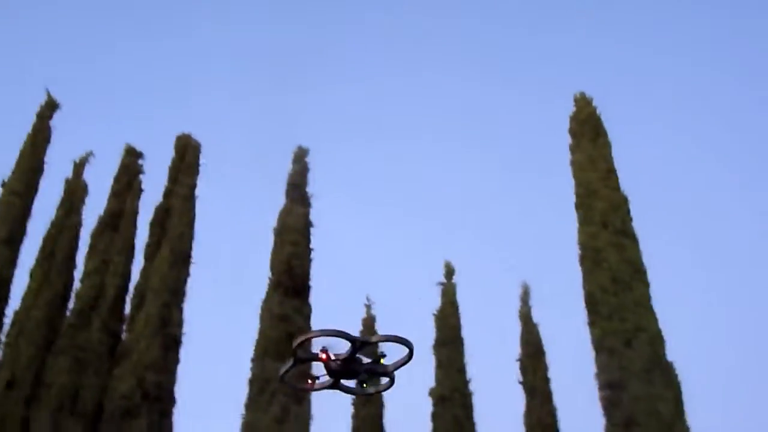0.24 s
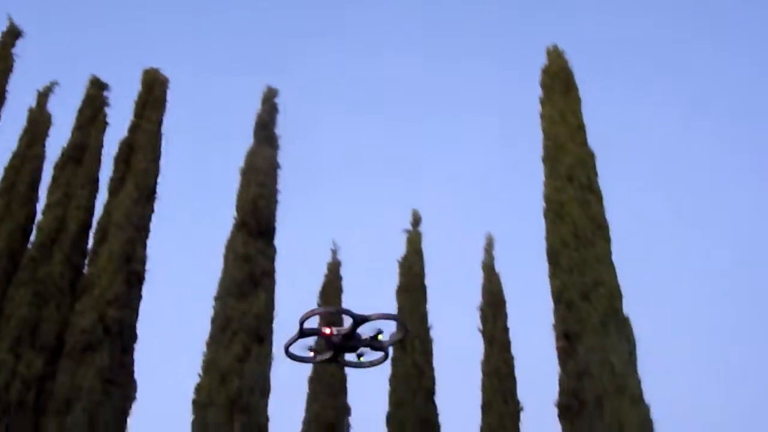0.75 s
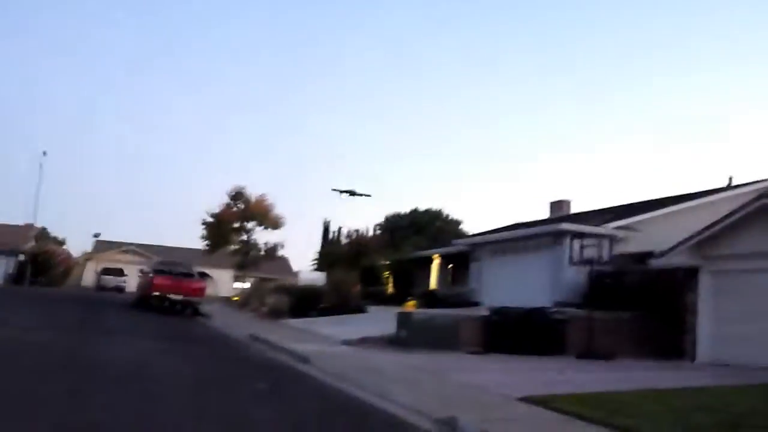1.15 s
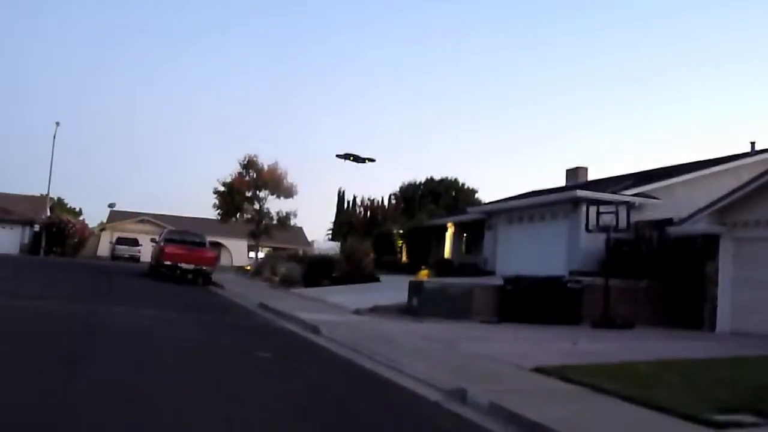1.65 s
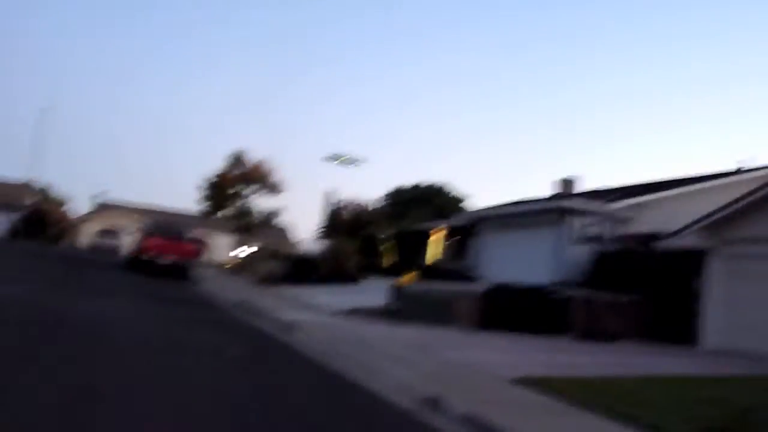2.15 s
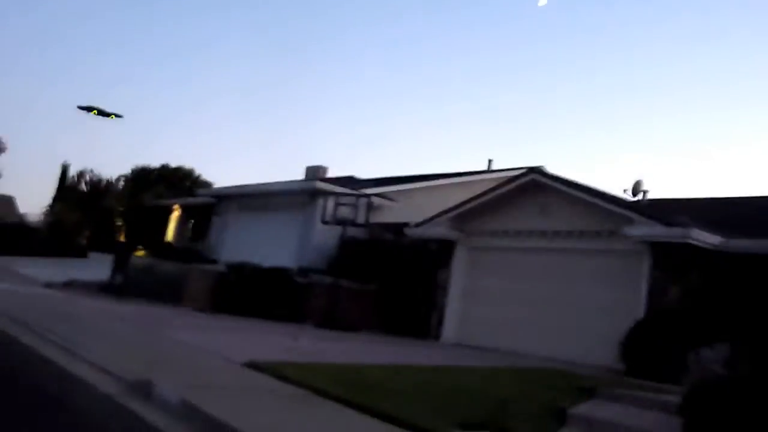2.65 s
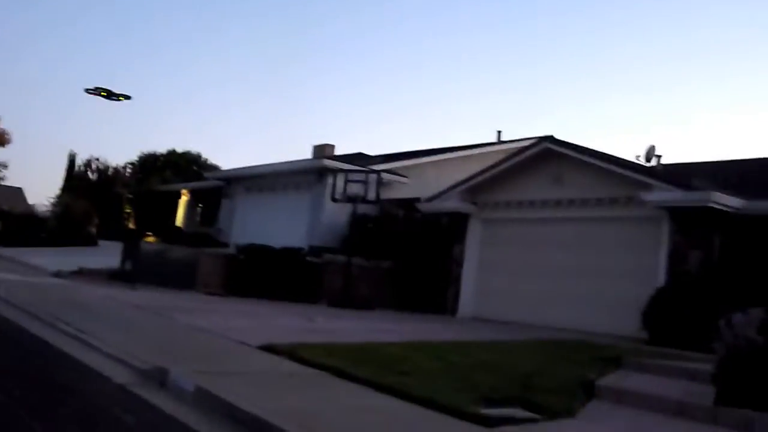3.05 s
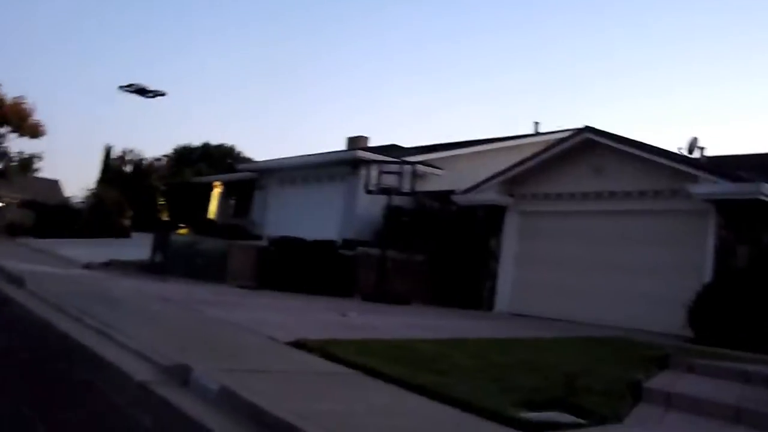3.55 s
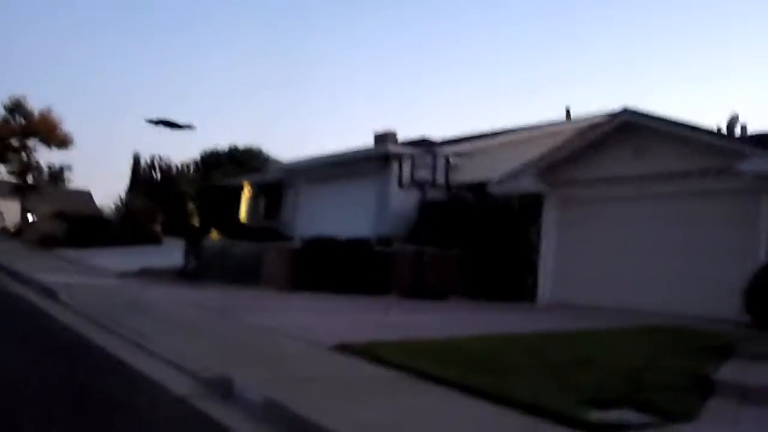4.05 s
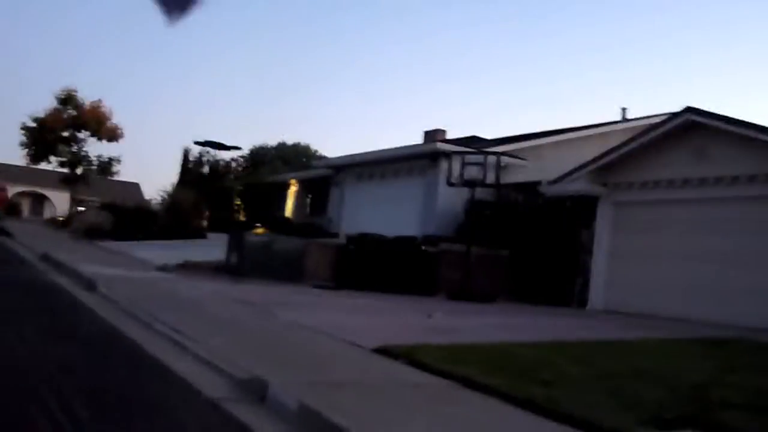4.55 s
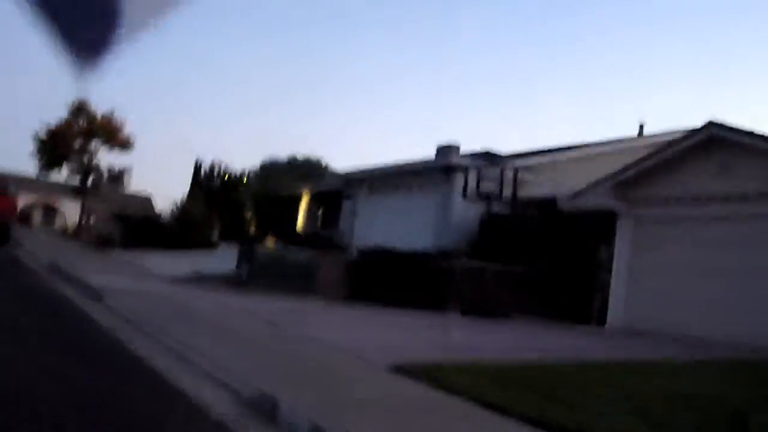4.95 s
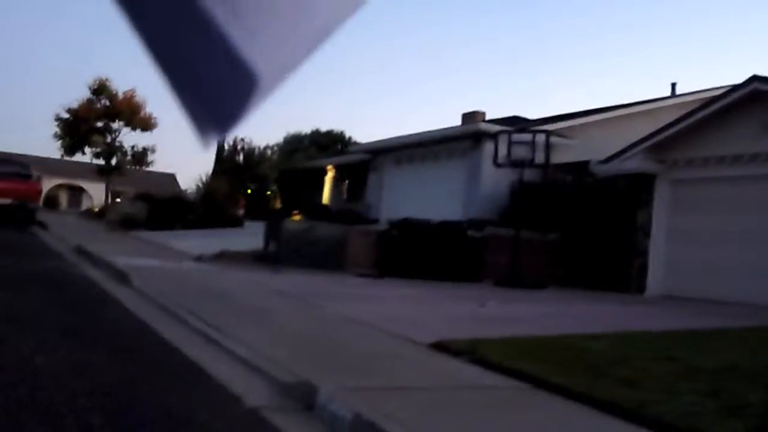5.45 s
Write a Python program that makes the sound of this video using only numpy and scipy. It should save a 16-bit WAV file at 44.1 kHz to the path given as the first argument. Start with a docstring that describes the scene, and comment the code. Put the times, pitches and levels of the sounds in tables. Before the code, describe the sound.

A small four-rotor drone hovers close to a hand-held camera outdoors, a rough buzz under bright gritty hiss and a shrill motor whine. After about a second it fades to half a second of silence, then returns suddenly, distant and quieter, as thin hiss and soft whir. Low street rumble, air puffs and sharp finger knocks on the camera accompany it.

```python
"""Quiet street: a small quadcopter hovers close to a hand-held camera, fades out, then returns far off.
Four rotors at slightly different speeds: summed shaft harmonics buzz, blade passes chop noise into wash.
Gear hiss is chopped resonant noise, combed by delayed copies off road and houses; motor whines are
wavering sines. Low noise buffets the microphone; fingers knock (struck modes, crack) and rub (random ticks)
on the camera body; a far engine hums (sine) over low town rumble (noise)."""
import sys
import numpy as np
from scipy import signal
from scipy.fft import rfft, irfft
from scipy.io import wavfile
from scipy.ndimage import uniform_filter1d, map_coordinates

SR = 44100
rng = np.random.default_rng(int(sys.argv[2]) if len(sys.argv) > 2 else 0)


def to_wav(s):
    """Save 16-bit WAV."""
    ch = np.atleast_2d(s).T  # columns
    pcm = np.round(np.clip(ch, -1, 1) * 32767)  # PCM
    wavfile.write(sys.argv[1], SR, pcm.astype(np.int16))


N = 250929

# base shaft speeds: t/s, slower pair f/Hz, faster pair f/Hz
SHAFT_SPEEDS = [(0, 60.46, 63.17), (.42, 59.97, 64.23), (.55, 61.6, 63.18), (.72, 61.04, 63.14),
                (1, 61.47, 62.64), (1.55, 58.6, 66.29), (2.3, 61.16, 70.08), (2.65, 61.4, 67.86),
                (2.82, 58.75, 68.75), (3.1, 59.12, 66.53), (3.451, 58.1, 65.69), (3.8, 60.4, 65.86),
                (4.25, 59.64, 64.63), (4.55, 59.8, 66.37), (4.85, 60, 66.27), (5.3, 60.24, 62.9),
                (5.69, 61.02, 63.36)]
# blade-tone spectrum, even harmonics: f/Hz, relative level/dB
BUZZ_SPECTRUM = [(60, -26), (120, -8.5), (185, -15), (245, -13), (310, 2), (370, -1.5), (430, 1), (490, 1),
                 (555, -6), (615, 2), (690, -10), (900, -3), (1100, -10.5), (2500, -13), (5000, -28)]
# road echo: t/s, lag/ms, mean strength (0-1)
ROAD_ECHO = [(0, 1.33, .3), (.2, 1.355, .24), (.55, 1.35, .2), (.75, 1.392, .26), (1, 1.435, .3),
             (1.55, 1.45, 0), (2.25, 1.53, .05), (2.5, 1.548, .34), (2.7, 1.605, .42), (3, 1.642, .4),
             (3.45, 1.7, .28), (3.9, 1.582, .32), (4.1, 1.535, .2), (4.3, 1.44, .3), (4.7, 1.324, .35),
             (4.95, 1.21, .3), (5.25, 1.1, .15), (5.69, .87, .3)]
# house echo: t/s, lag/ms, mean strength (0-1)
HOUSE_ECHO = [(0, 1.96, .18), (.5, 1.9, .08), (1.55, 1.875, .28), (2, 1.935, .36), (2.2, 1.858, .34),
              (2.37, 1.83, .22), (2.6, 1.86, .2), (3.3, 2.07, .14), (4.4, 2, .17), (5, 1.85, .12),
              (5.69, 1.85, .1)]
# gear resonances: f/Hz, width/Hz, relative level/dB
GEAR_RESONANCES = [(5400, 210, -3), (8220, 640, 13), (8760, 350, 12.5), (9450, 810, 10.5),
                   (10700, 210, -5.5)]
# hiss spectrum, close by: f/Hz, relative level/dB
NEAR_HISS_SPECTRUM = [(1200, -47.5), (3200, -2), (5000, -7.5), (7300, -1), (9000, -11), (11000, -3),
                      (13000, -0.5), (15500, -2)]
# hiss spectrum, far off: f/Hz, relative level/dB
FAR_HISS_SPECTRUM = [(1200, 4.5), (3400, 4), (5000, 5.5), (7300, 2.5), (9000, 4.5), (11000, -2), (12500, 6),
                     (15500, -1.5)]
# weighting of hiss that differs between the ports, close by: f/Hz, relative level/dB
NEAR_SCATTER = [(1200, -19), (2000, -20.5), (3500, 0), (5000, -5.5), (6300, -7), (9000, -11), (12000, -3.5),
                (13000, -21), (15000, -16)]
# the same, far off: f/Hz, relative level/dB
FAR_SCATTER = [(1200, -6), (2000, -5), (3500, 7), (6000, -4.5), (9000, 7), (12000, 5), (15000, 2)]
# rotor wash spectrum, close by: f/Hz, relative level/dB
NEAR_WASH_SPECTRUM = [(100, -17.5), (250, -5), (330, 6), (400, -7.5), (460, 7.5), (660, -2.5), (740, 2),
                      (1000, -3.5), (1400, -2), (2000, -6.5), (3500, -8), (7000, -20)]
# rotor wash spectrum, far off: f/Hz, relative level/dB
FAR_WASH_SPECTRUM = [(100, -54), (250, 0.5), (350, -2.5), (500, 4), (680, 1.5), (790, -6), (1000, -4.5),
                     (1400, -9), (2000, -14), (3500, -12), (7000, -55)]
# wash surges as the drone steadies itself: t/s, 1/e half-length/s, rise/dB
WASH_SURGES = [(0.436, 0.17, 1), (0.81, 0.081, 0), (2.0, .1, 3), (2.437, 0.067, 3), (3.197, 0.067, 3),
               (3.38, 0.022, 3), (3.85, 0.063, 2.5), (4.487, 0.083, 4), (5.47, 0.29, 3.5)]
# blade tones that stand out, close by: t/s, 1/e half-length/s, mean level/dB, multiple of shaft speed
BLADE_FLARES = [(.06, .08, -52, 17), (.28, .17, -48, 15), (.53, .07, -45, 10), (.73, .06, -43.5, 10),
                (.82, .05, -46, 8), (.88, .07, -51, 16)]
# shrill motor whine, close by: t/s, base pitch f/Hz, base level/dB
SHRILL_WHINE = [(0, 8190, -42), (.2, 8320, -39.5), (.32, 8320, -42), (.55, 8370, -45.5), (.72, 8500, -46),
                (1.03, 8260, -45)]
# fuzzy components of that whine: ratio to base pitch, relative level/dB
SHRILL_PARTIALS = [(.395, -13), (.64, -13), (1, -.5), (1.075, -4), (1.165, -4.5)]
# town rumble spectrum: f/Hz, relative level/dB
RUMBLE_SPECTRUM = [(25, -16), (45, 2.5), (80, -1), (140, 0.5), (220, -1), (330, -22), (600, -7),
                   (1500, -20), (5000, -22.5), (12000, -24)]
# air buffets: t/s, 1/e half-length of power/s, relative level/dB
AIR_BUFFETS = [(0.42, 0.017, -38), (0.662, 0.01, -38.5), (0.944, 0.072, -38), (1.617, 0.07, -43),
               (1.74, 0.042, -38), (1.805, 0.014, -37), (1.853, 0.047, -40), (2.27, 0.044, -46.5)]
# wind-noise spectra under the drone and in the open: f/Hz, relative level/dB
DOWNWASH_SPECTRUM = [(25, -22.5), (60, 3.5), (110, 0.0), (180, -7.5), (300, -27.0), (1000, -57.5)]
BREEZE_SPECTRUM = [(25, -34), (60, -4.5), (110, 0.5), (180, -8), (300, -16.0), (1000, -60)]
# far highest hiss, applied once from 11 kHz and again from 13.8 kHz: t/s, gain/dB
TOP_HISS = [(1.55, -2.5), (2.2, -1.5), (2.45, 2.5), (2.7, 0.5), (2.95, 2), (3.37, 3), (3.47, 3), (3.75, 0),
            (4.2, 1.5), (5, -1), (5.3, -3), (5.69, -1.5)]
# far whines, swelling as a motor turns toward the camera: t/s, 1/e half-length/s, mean level/dB, line
FAR_WHINES = [(1.682, .2, -58, "high"), (2.09, 0.35, -59, "middle"), (2.85, 0.5, -58, "high"),
              (3.52, 0.083, -53.5, "middle"), (3.82, 0.24, -56.5, "middle"), (4.5, 0.32, -58, "middle"),
              (4.6, 0.25, -62, "low"), (5.48, 0.3, -57.5, "high")]
# whine lines: name -> (pair: 0 slower, 1 faster; multiple of shaft speed)
WHINE_RATIOS = {"low": (0, 52), "middle": (1, 54), "high": (0, 71.5)}
# finger knocks: t/s, ring peak level/dB, centre f/Hz, spread/octaves,
# crack level relative to ring/dB, ring time relative to free ring
FINGER_KNOCKS = [(1.847, -27, 140.3, 0.59, -50, 1), (1.9291, -19.5, 376, 0.78, -40, 0.46),
                 (2.0293, -16, 555, 0.98, -27, 0.98), (2.04, -21, 3460, 0.27, -2, 0.51),
                 (2.047, -20, 960, 0.18, -20, 1.4), (2.0507, -12, 980, 0.87, -7, 0.52),
                 (2.052, -34, 451, 0.13, -50, 1.04), (2.0525, -17.5, 3100, 0.083, -1, 0.33),
                 (2.106, -21.5, 2580, 1.6, -19, 0.39), (2.348, -30.5, 1740, 0.47, -10, .7),
                 (2.416, -30.5, 1750, 0.35, -14, .6), (2.478, -27, 1690, 0.22, -20, 1),
                 (2.722, -28, 1420, 0.48, -22, .6), (3.049, -26, 4006, 0.54, -11, .8),
                 (3.104, -23, 1830, 2.7, -4, 0.87), (3.117, -27, 3006, 0.85, -5, 0.64),
                 (3.992, -25, 542.5, 0.6, -22, 0.44), (4.114, -22.5, 1300, 0.52, -2.5, 0.58),
                 (5.0703, -10, 3007, 0.77, -7.5, 1.3), (5.0714, -12.5, 1468, 0.58, -31, 1.24),
                 (5.0733, -22.5, 700, 0.41, -34, 1), (5.132, -29, 707, 1.2, -22, .5),
                 (5.2242, -24, 651, 0.8, -26, .4)]
# camera body modes: f/Hz, free t60/s, relative level/dB
BODY_MODES = [(139, 0.044, 8), (265, 0.027, 6), (365, 0.054, 3), (451, 0.3, -4), (560, 0.024, 6),
              (675, 0.042, 4), (1010, 0.04, 0), (1160, 0.052, 4), (1350, 0.042, -1), (1560, 0.029, 0),
              (1770, 0.028, 1), (2230, 0.026, 6), (3080, 0.014, 3), (3680, 0.016, 5), (4130, 0.02, -3),
              (5500, 0.015, 2)]
# finger rubs: t/s, 1/e half-length of power/s, relative level/dB
FINGER_RUBS = [(2.46, 0.027, -59), (3.108, 0.019, -46), (3.211, 0.03, -46.5)]
# rub spectrum: f/Hz, relative level/dB
RUB_SPECTRUM = [(150, -10), (450, 2), (900, 6), (1800, 2), (3000, -10), (6500, -12), (12000, -35)]
# camera notch filters: f/Hz, width/Hz
CAMERA_NOTCHES = [(2610, 835), (4600, 500), (7930, 340)]

# flight levels before the drone() trims
NEAR_HISS_BASE_DB, NEAR_WASH_BASE_DB, CLIMB_DB_PER_S = -34.5, -36, -2.5
FAR_HISS_BASE_DB, FAR_WASH_BASE_DB = -48, -45.5
BANK_S, HISS_DB_PER_S = 3.85, -0.65
DIP_START_S, DIP_FALL_S, DIP_RECOVER_S, DIP_DB = 3.37, .03, .13, -13
# far blade tones, mean levels; the octave starts here and grows
BLADE_DB, OCTAVE_DB, OCTAVE_DB_PER_S = -58.5, -60.5, 1.8
# far engine: moment of greatest swell, 1/e time, mean level and pitch then, pitch slope
ENGINE_S, ENGINE_LENGTH_S, ENGINE_DB = 2.7, 2.1, -50.5
ENGINE_HZ, ENGINE_HZ_PER_S = 89.5, -2
FADE_START_S, FADE_END_S, RETURN_S, RETURN_RISE_S = 0.91, 1.034, 1.54, 0.0082
TOP_HZ = 15700

T = np.arange(N) / SR
FREQ = np.maximum(np.fft.rfftfreq(N, 1 / SR), 1)
SIDES = np.array([[1], [-1]])  # left, right


def undb(db):
    """Amplitude gain of a level in dB."""
    return 10 ** (np.asarray(db) / 20)


def unit(x):
    """Scale to rms 1."""
    return x / np.sqrt(np.mean(x ** 2))


def curves(rows):
    """Table columns, interpolated linearly in time."""
    s, *columns = np.transpose(rows)
    return [np.interp(T, s, c) for c in columns]


def shape(points, hz):
    """Gain of a spectrum table at hz, interpolated in log frequency."""
    f, db = np.transpose(points)
    return undb(np.interp(np.log(hz), np.log(f), db))


def colour(x, gain):
    """Filter by a gain per frequency; rms 1."""
    return unit(irfft(rfft(x) * gain, N))


def noise():
    """White Gaussian noise."""
    return rng.standard_normal(N)


def walk(rate_hz):
    """Random levels held 1 / rate_hz and slewed; rms 1."""
    hold = int(SR / rate_hz)
    steps = np.repeat(noise()[:N // hold + 1], hold)
    return unit(uniform_filter1d(uniform_filter1d(steps, hold), hold)[:N])


def tone(hz):
    """Sine of rms 1 on a moving pitch."""
    return unit(np.sin(2 * np.pi * np.cumsum(hz) / SR))


def swell(s, length_s):
    """Gaussian rise and fall about s; top 1."""
    return np.exp(-((T - s) / length_s) ** 2)


def rotor_turns():
    """Angles of four rotors in turns: rear ones run faster, the flight controller nudges each."""
    turns = []
    for hz in curves(SHAFT_SPEEDS):
        for rear in (0, 1):
            shaft_hz = hz * (1 + rear * .012 + .003 * walk(9))
            turns.append(np.cumsum(shaft_hz) / SR + rng.random())
    return turns


def buzz(turns, odd_db=-4, flutter_db=2.5, rotor_db=(0, -6, -2, -7), count=48):
    """Shaft harmonics: two unequal blades leave weaker odd ones; the hull shades the rear rotors."""
    out, cycle = 0, np.linspace(0, 1, 2048)
    k = np.arange(1, count + 1)[:, None]
    gains = shape(BUZZ_SPECTRUM, k * SHAFT_SPEEDS[0][1]) * undb(odd_db * (k % 2))
    for turn, db in zip(turns, rotor_db):
        phases = 2 * np.pi * (k * cycle + rng.random((count, 1)))
        one_turn = np.sum(gains * np.sin(phases), axis=0)
        out = out + np.interp(turn % 1, cycle, one_turn) * undb(db + flutter_db * walk(21.95))
    return unit(out)


def chop(turns, sharpness=0.2):
    """Turbulence flares each time a blade passes a strut, twice per turn."""
    power = sum(np.exp(sharpness * np.cos(4 * np.pi * turn)) for turn in turns)
    return unit(np.sqrt(power))


def echoes(x, fade_db=2.5):
    """Delayed copies off road and houses: sliding combs that come and go as the drone sways."""
    out = x
    for lag_ms, share in (curves(ROAD_ECHO), curves(HOUSE_ECHO)):
        delayed = map_coordinates(x, [np.arange(N) - lag_ms * SR / 10 ** 3], order=3)
        out = out + share * undb(fade_db * walk(7)) * delayed
    return unit(out)


def drone(flight, turns, wash_spectrum, hiss_spectrum, scatter, gear_db,
          hiss_trim_db, rotors_trim_db, buzz_db, side_db):
    """Blade tones, chopped wash and gear hiss; scattered sound widens the hiss."""
    hiss_level, wash_level = undb(flight)
    blades = chop(turns)
    gear_power = sum(undb(db + gear_db) ** 2 / (1 + (2 * (FREQ - hz) / width) ** 2)
                     for hz, width, db in GEAR_RESONANCES)
    air = shape(hiss_spectrum, FREQ)
    hiss = echoes(colour(blades * noise(), np.sqrt(air ** 2 + gear_power)))
    scattered = echoes(colour(blades * noise(), air * shape(scatter, FREQ))) * undb(side_db)
    wash = colour(blades * noise(), shape(wash_spectrum, FREQ)) * undb(1.0 * walk(25))
    rotors = undb(rotors_trim_db) * unit(wash + undb(buzz_db) * buzz(turns))
    hiss_gain = hiss_level * undb(hiss_trim_db + 0.65 * walk(60))
    wide_hiss = (hiss + SIDES * scattered) * undb(SIDES * 0.82)  # leans left
    return wash_level * rotors + hiss_gain * wide_hiss


def surges():
    """Rise of the wash in dB as the drone steadies itself."""
    return sum(db * swell(s, length_s) for s, length_s, db in WASH_SURGES)


def near_flight():
    """Hiss and wash base levels in dB; hiss sinks as the drone lifts away."""
    return NEAR_HISS_BASE_DB + CLIMB_DB_PER_S * T, NEAR_WASH_BASE_DB + surges()


def shrill(jitter=.008, waver=.003, flutter_db=2.5):
    """High motor whine and side tones, each wavering and fluttering independently."""
    hz, db = curves(SHRILL_WHINE)
    out = 0
    for ratio, tone_db in SHRILL_PARTIALS:
        level = undb(db + tone_db + flutter_db * walk(40))
        out = out + level * tone(ratio * hz * (1 + waver * walk(14) + jitter * walk(600)))
    return out


def street(rumble_db=-47, side_db=-17):
    """Low town rumble, and a far engine as a sine that swells, sinks in pitch and fades."""
    mid, side = (colour(noise(), shape(RUMBLE_SPECTRUM, FREQ)) for _ in range(2))
    rumble = undb(rumble_db + 1.0 * walk(3.9)) * (mid + SIDES * undb(side_db) * side)
    hz = ENGINE_HZ + ENGINE_HZ_PER_S * (T - ENGINE_S)
    engine_level = swell(ENGINE_S, ENGINE_LENGTH_S) * undb(ENGINE_DB + 0.59 * walk(6))
    return rumble + engine_level * tone(hz * (1 + 0.039 * walk(10)))


def buffets(near_side_db=0, far_side_db=-4, breeze_db=-54):
    """Air puffs rumble on the microphone ports, whose separate eddies add a side signal."""
    strength = np.sqrt(sum(undb(db) ** 2 * swell(s, length_s) for s, length_s, db in AIR_BUFFETS))
    downwash, breeze = shape(DOWNWASH_SPECTRUM, FREQ), shape(BREEZE_SPECTRUM, FREQ)
    near = colour(noise(), downwash) + SIDES * undb(near_side_db) * colour(noise(), downwash)
    far = colour(noise(), breeze) + SIDES * undb(far_side_db) * colour(noise(), breeze)
    # steady air noise only close by
    air = np.where(T < FADE_END_S, (strength + undb(breeze_db)) * near, strength * far)
    return air * undb(SIDES * 0.73)


def flares(turns, flutter_db=2.5):
    """Single harmonics of the leading rotor swell, flutter and sink."""
    out = 0
    for s, length_s, db, multiple in BLADE_FLARES:
        harmonic = unit(np.sin(2 * np.pi * multiple * turns[0]))
        out = out + undb(db + flutter_db * walk(35)) * swell(s, length_s) * harmonic
    return out


def far_flight():
    """Hiss and wash base levels in dB; hiss peaks on banking toward the camera and dips once."""
    bank_db = HISS_DB_PER_S * np.abs(T - BANK_S)
    dip_times_s = np.cumsum([0, DIP_FALL_S, DIP_RECOVER_S])
    dip_db = np.interp(T - DIP_START_S, dip_times_s, [0, DIP_DB, 0])
    return FAR_HISS_BASE_DB + bank_db + dip_db, FAR_WASH_BASE_DB + surges()


def beamed(x, edges_hz=(11000, 13800)):
    """Directional top hiss swells and sinks, by twice the dB above the upper edge."""
    air_db, = curves(TOP_HISS)
    for hz in edges_hz:
        top = irfft(rfft(x) / (1 + (hz / FREQ) ** 20), N)
        x = x + (undb(air_db) - 1) * top
    return x


def far_tones(turns, jitter=0.009, flutter_db=2, waver=.005):
    """Blade rate and its octave, and fuzzy motor whines gliding with the shaft speeds."""
    octave_db = OCTAVE_DB + OCTAVE_DB_PER_S * (T - RETURN_S)
    blade_rate = unit(np.sin(4 * np.pi * turns[0]))
    octave = unit(np.sin(8 * np.pi * turns[0]))
    out = undb(BLADE_DB + 2 * walk(11.0)) * blade_rate + undb(octave_db + 2 * walk(11)) * octave
    shaft_hz = curves(SHAFT_SPEEDS)
    for s, length_s, db, line in FAR_WHINES:
        pair, multiple = WHINE_RATIOS[line]
        hz = multiple * shaft_hz[pair] * (1 + waver * walk(12) + jitter * walk(200))
        out = out + swell(s, length_s) * undb(db + flutter_db * walk(110)) * tone(hz)
    return out


def knocks(crack_s=0.0036, rattle_s=0.006, rattle_db=-18, side_db=-2, lean_db=4.0):
    """Fingers ring body modes near each contact's centre frequency, with a crack and brief rattle."""
    out, t = np.zeros((2, N)), T[:SR // 5]
    hz, t60_s, mode_db = np.transpose(BODY_MODES)[:, :, None]
    # modes above 1 kHz lean to the left port
    ports = undb(SIDES * lean_db * np.clip(np.log2(hz.T / 1000), 0, 2))
    bins_hz = np.maximum(np.fft.rfftfreq(len(t), 1 / SR), 1)
    for s, db, centre_hz, octaves, crack_db, free in FINGER_KNOCKS:
        def contact(f):
            """Gaussian contact spectrum in log frequency."""
            return np.exp(-(np.log2(f / centre_hz) / octaves) ** 2 / 2)

        modes = np.sin(2 * np.pi * hz * t) * np.exp(-np.log(1000) * t / (t60_s * free))
        ring = ports @ (modes * undb(mode_db) * contact(hz))
        band_hz = np.minimum(centre_hz * 2 ** (octaves * np.array([-1.7, 2.2])), .45 * SR)
        ring = signal.sosfilt(signal.butter(2, band_hz, "band", fs=SR, output="sos"), ring)
        rattle = unit(irfft(rfft(rng.standard_normal(len(t))) * contact(bins_hz), len(t)))
        rattle = rattle * np.exp(-t / rattle_s) * undb(rattle_db)
        crack = uniform_filter1d(rng.standard_normal((2, len(t))), size=2)
        mid, side = crack * np.exp(-t / crack_s) * undb(crack_db) / 2
        knock = ring / np.abs(ring).max() + rattle + mid + SIDES * undb(side_db) * side
        i = int(s * SR)
        out[:, i:i + len(t)] += undb(db) * knock
    return out


def rubs(slips_per_s=1200, scatter_db=3):
    """Skin sticks and slips on plastic: dense uneven ticks, coloured by the body."""
    pressure = np.sqrt(sum(undb(db) ** 2 * swell(s, length_s) for s, length_s, db in FINGER_RUBS))
    ticks = rng.random(N) < slips_per_s / SR
    slips = ticks * noise() * undb(scatter_db * rng.standard_normal(N))
    return pressure * colour(slips, shape(RUB_SPECTRUM, FREQ))


def scene():
    """Near drone, then far drone, over street, air and handling noise."""
    turns = rotor_turns()
    near = drone(near_flight(), turns, NEAR_WASH_SPECTRUM, NEAR_HISS_SPECTRUM, NEAR_SCATTER,
                 gear_db=-6.5, hiss_trim_db=0.83, rotors_trim_db=0.0, buzz_db=2, side_db=-13.0)
    far = drone(far_flight(), turns, FAR_WASH_SPECTRUM, FAR_HISS_SPECTRUM, FAR_SCATTER,
                gear_db=-4, hiss_trim_db=1, rotors_trim_db=-0.5, buzz_db=-3.0, side_db=-1.0)
    near = near + flares(turns) + shrill()
    far = beamed(far) + far_tones(turns)
    flight = np.where(T < FADE_END_S, near, far)
    return flight + street() + buffets() + knocks() + rubs()


def record(dry):
    """Camera notches three bands; treble rolls off; sound fades to silence and returns fast."""
    for hz, width_hz in CAMERA_NOTCHES:
        dry = signal.lfilter(*signal.iirnotch(hz, hz / width_hz, fs=SR), dry)
    dry = signal.sosfilt(signal.butter(10, 14900, fs=SR, output="sos"), dry)
    fade_times_s = [FADE_START_S, FADE_END_S, RETURN_S, RETURN_S + RETURN_RISE_S]
    fade = np.interp(T, fade_times_s, [1, 0, 0, 1])
    return signal.sosfilt(signal.ellip(12, .2, 80, TOP_HZ, fs=SR, output="sos"), dry * fade)


dry = scene()
out = record(dry)
to_wav(out)
```